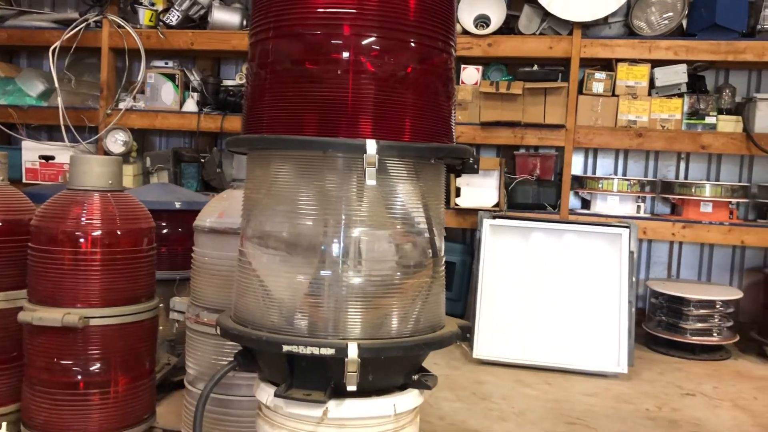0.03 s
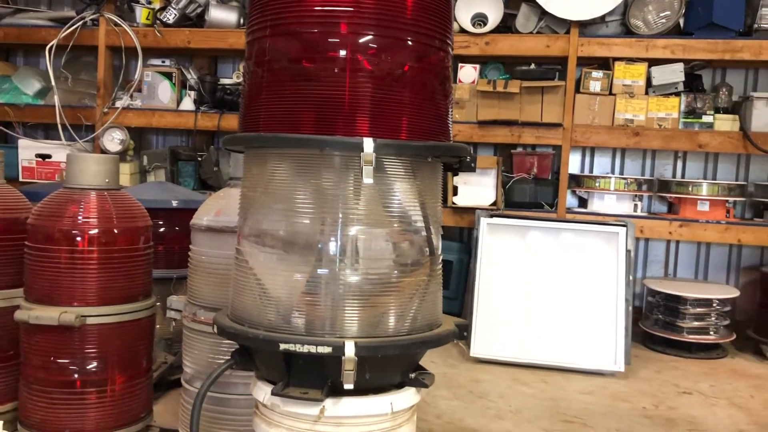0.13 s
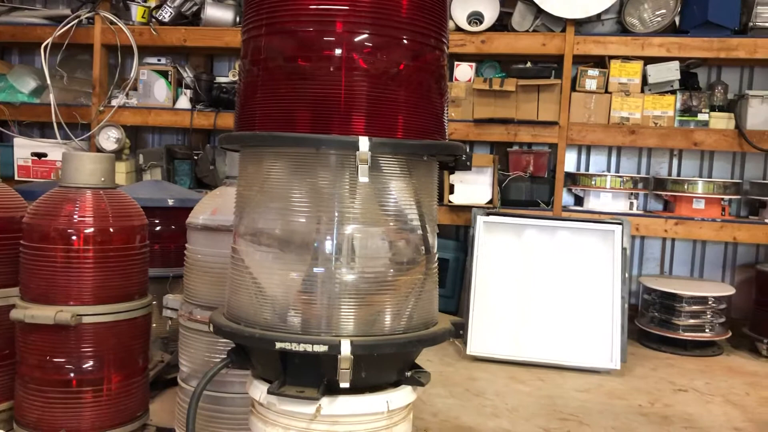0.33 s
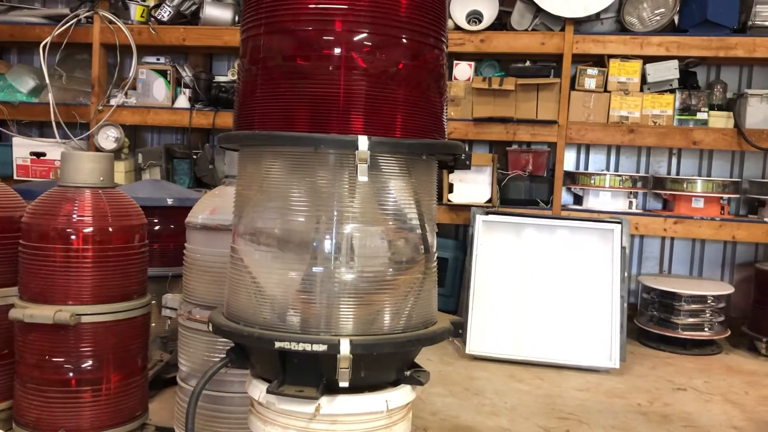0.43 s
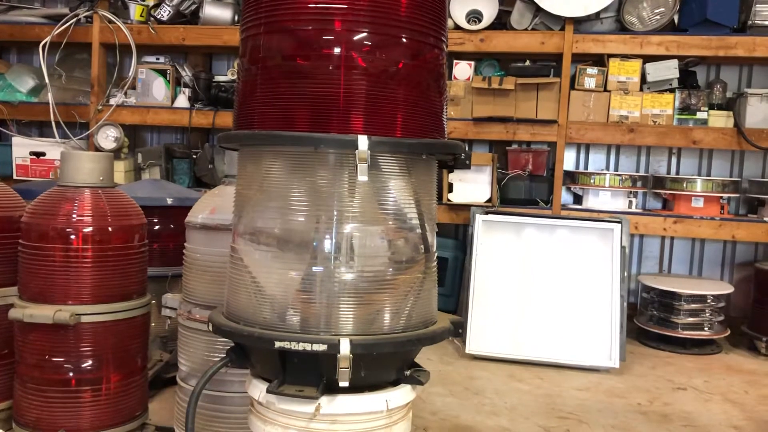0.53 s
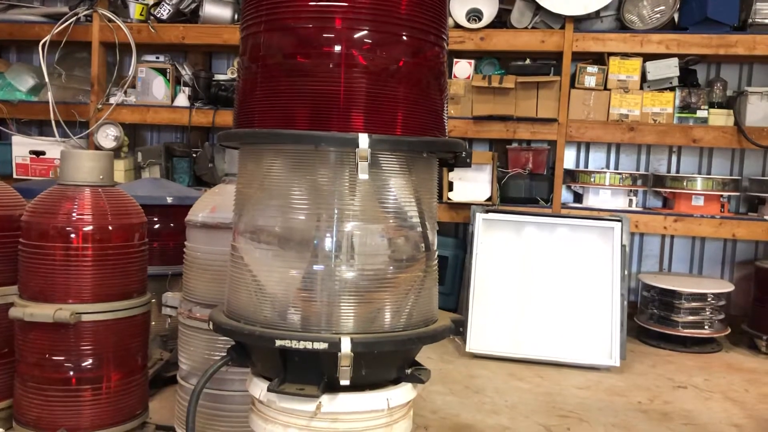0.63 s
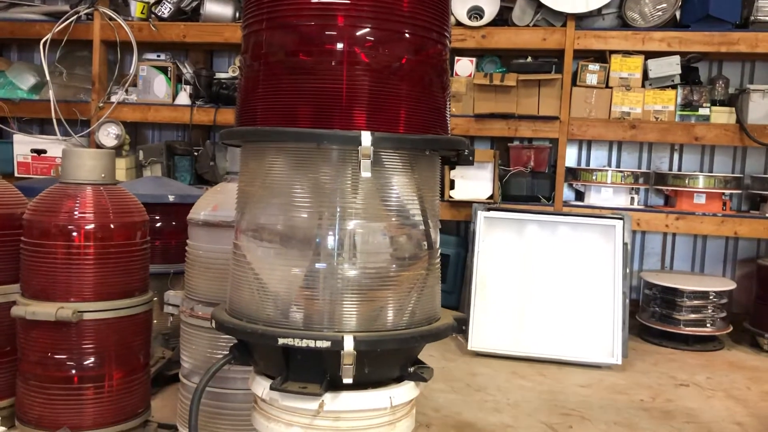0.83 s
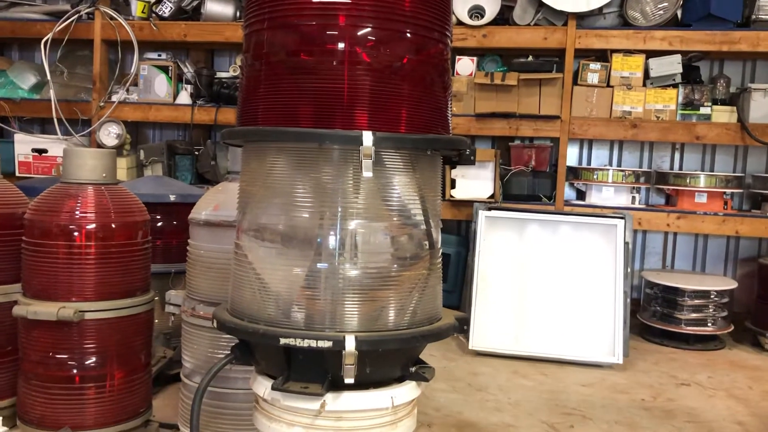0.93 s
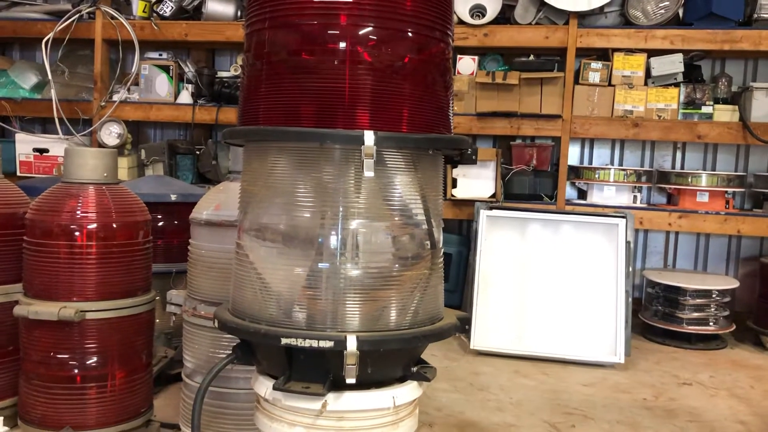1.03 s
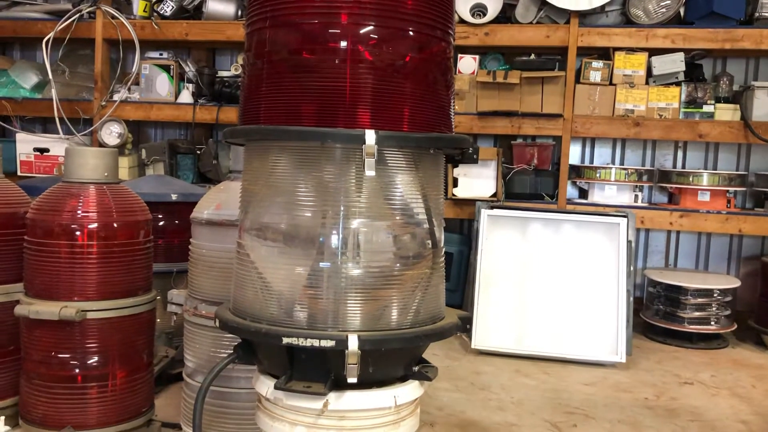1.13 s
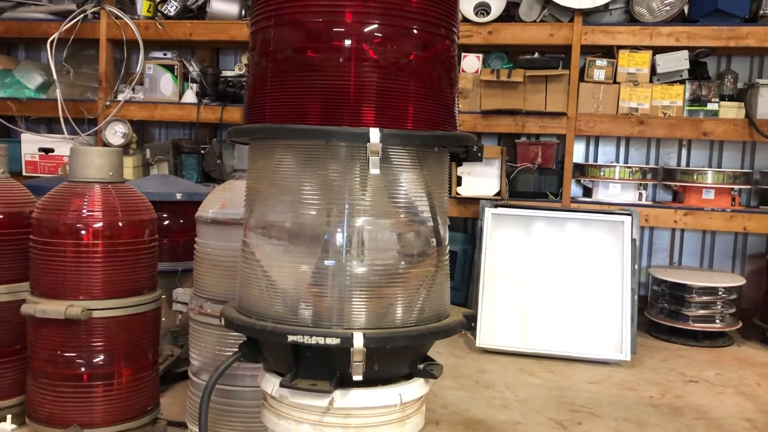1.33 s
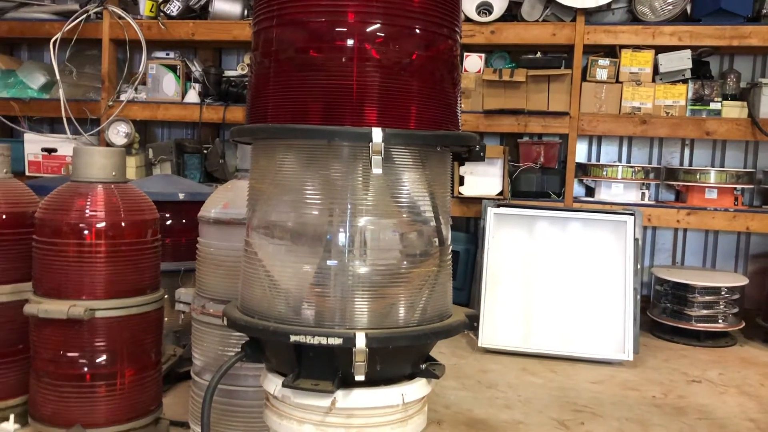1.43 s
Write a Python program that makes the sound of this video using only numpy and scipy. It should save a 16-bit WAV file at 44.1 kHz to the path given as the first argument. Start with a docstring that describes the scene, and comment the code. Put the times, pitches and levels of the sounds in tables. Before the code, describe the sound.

A strobe beacon fires with one sharp pop that rings briefly through a workshop. After a short pause, its power supply recharges with a thin, sizzling electrical buzz, over a faint hum and low room rumble.

```python
"""A workshop rumbles softly under a faint transformer hum. A strobe beacon fires once:
the trigger ticks, the flash tube pops inside its ribbed lens and the room rings.
After a short pause the power supply recharges, buzzing to the end: its core chirps and
whistles in step with the mains, over a rattle of laminations and a fine sizzle."""
import sys
import numpy as np
from scipy import signal
from scipy.fft import rfft, irfft
from scipy.io import wavfile

SR = 44100
rng = np.random.default_rng(int(sys.argv[2]) if len(sys.argv) > 2 else 0)


def bounce(signal):
    """Save signal as a 16-bit WAV file at the path given by the first command-line argument."""
    frames = np.transpose(np.atleast_2d(signal))
    limited = np.clip(frames, -1, 1)
    pcm = np.round(limited * 32767).astype(np.int16)
    wavfile.write(sys.argv[1], SR, pcm)


N = 66150
MAINS_HZ, TOP_HZ = 59.987, 15780
FLASH_S, CHARGE_S, CHARGE_RISE_S = 0.2177, 0.3835, 0.0014

# tone of the room's rumble (frequency [Hz], relative level [dB])
RUMBLE_EQ = [(20, -66), (32, -30), (46, -3.5), (100, -6), (160, -10.5), (260, -9), (400, -12.5), (800, -15),
             (1100, -22.5), (2000, -23.5), (3500, -25), (5000, -29), (8000, -34.5), (15000, -37)]
# transformer partials (mains multiple [rounded when played], idle level [dB], charging level [dB])
HUM_PARTIALS = [(4, -73.5, -74), (8, -69.5, -67.5), (10, -80, -77.5), (12, -79, -84), (20, -78, -82),
                (22, -76.5, -75), (28, -80.5, -88), (32, -83, -80.5), (36, -86, -83.5), (40, -87, -86),
                (48, -84, -74), (56, -81.5, -101), (62, -85, -62), (65, -90, -90), (66.25, -80, -73),
                (76.7, -85, -72)]
# core chirps (delay [ms], pitch [Hz], glide [Hz/ms], half length [ms], relative level [dB],
# signed gain in the other half cycle [ratio])
CORE_CHIRPS = [(6.45, 14530, 300, .6, -43, 1), (7.9, 14500, 0, .5, -56, 1),
               (5.5, 9800, -200, .65, -45.7, -.8), (5.8, 9000, 0, .7, -53, -1),
               (7.7, 7300, 200, .65, -53, -1), (10.2, 5270, 120, 1.3, -57, -.3),
               (1.9, 5230, 120, 1.3, -54, -.2), (.3, 4200, 150, 1, -57, 0)]
# whistles in one direction of the current only
# (delay [ms], pitch [Hz], glide [Hz/ms], half length [ms], relative level [dB])
CORE_WHISTLES = [(5.8, 3545, 32, 2.5, -47.2), (8.7, 4200, 100, 1.5, -51.5), (3.6, 3000, 150, 1.2, -65),
                 (2.5, 11600, 0, 1.3, -56)]
# lamination rattle (frequency [Hz], relative level of even harmonics [dB], of odd harmonics [dB])
RATTLE_EQ = [(700, -90, -93), (1900, -86, -91), (2600, -87, -91), (3200, -83, -85), (3800, -80, -75),
             (4450, -77, -70), (4750, -81, -74), (5300, -76, -69), (6100, -85, -73), (6900, -90, -69),
             (7700, -88, -74), (8300, -86, -77), (9000, -78, -70), (10500, -77, -74), (11000, -77, -75),
             (11600, -73, -76), (12050, -84, -83), (12500, -73, -78), (13000, -71, -80), (13550, -77, -84),
             (14200, -72, -85), (15100, -72, -86), (15700, -69, -85)]
# tone of the sizzle (frequency [Hz], relative level [dB])
SIZZLE_EQ = [(1000, -28), (3000, -20), (3600, -5), (6000, -6), (7000, -4), (8300, -6), (9800, 0),
             (11200, -6), (11600, -3), (12100, -8), (13000, -4), (13700, -5), (14300, 3), (15700, -1)]
# narrow resonances of the supply's case (frequency [Hz], width [Hz], boost [dB])
CASE_PEAKS = [(4139, 50, 5), (5339, 40, 3), (7019, 50, 7), (7499, 40, 5), (7978, 50, 9), (9058, 40, 3),
              (9898, 40, 5), (10018, 40, 3), (14037, 60, 10.5), (14277, 50, 4), (14877, 40, 4),
              (14997, 60, 8)]
# tone of the reverb tail (frequency [Hz], relative level [dB])
TAIL_EQ = [(100, -36), (300, -24), (490, -2.5), (660, -15.5), (900, -1.5), (1150, -6), (1550, -9),
           (2200, 0), (2650, -4.5), (3820, 1.5), (4450, -6), (6350, -8.5), (8000, -13.5), (10400, -10),
           (15500, -14.5)]
# ring time of the room (frequency [Hz], time to fall 60 dB [s])
TAIL_T60 = [(300, 0.6), (900, 0.88), (2200, 0.97), (4000, 0.82), (7000, 0.87), (11000, 0.36), (15000, .3)]
# trigger knocks (time [s], lower band edge [Hz], width [Hz], decay [s], level [dB])
TRIGGER_KNOCKS = [(0.2106, 377, 400, 0.0059, -46), (0.2135, 2930, 1700, .003, -45)]
# hollow knock of the air inside the lens (pitch [Hz], decay [s], level [dB])
CAVITY_MODES = [(864, 0.0054, -30), (998, 0.0063, -34.5)]
# tone of the pop (frequency [Hz], relative level [dB])
POP_EQ = [(100, -43), (300, -28.5), (420, -6.5), (560, -5.5), (660, -21.5), (800, -7.5), (1000, -4.5),
          (1450, -15), (1900, -12), (2200, 1.5), (2600, -10.5), (3900, -2), (4700, -7), (7000, -7.5),
          (8300, -13), (10200, -8.5), (12600, -12), (13600, -20), (16000, -19.5)]
# resonances of tube and lens (frequency [Hz], width [Hz], boost [dB])
LENS_PEAKS = [(496, 110, 2.5), (910, 140, 2.5), (2250, 97, 2.5), (2965, 120, 10), (3860, 470, 6.5),
              (6620, 120, 7), (7340, 180, 2.5)]


def undb(db):
    """Decibels to gain."""
    return 10 ** (np.asarray(db) / 20)


def unit(x):
    """Scale to rms 1."""
    return x / np.sqrt(np.mean(x ** 2))


def along(points, hz):
    """Read (Hz, value) points on a log-frequency axis."""
    f, v = np.array(points, float).T
    return np.interp(np.log(np.maximum(hz, 1)), np.log(f), v)


def colour(x, points=((1, 0), (SR, 0)), peaks=(), keep_power=True):
    """Minimum-phase EQ: a broad curve plus resonant peaks."""
    hz = np.arange(N + 1) * SR / (2 * N)
    boost_db = sum(db / (1 + (2 * (hz - f) / width) ** 2) for f, width, db in peaks)
    gain = undb(along(points, hz) + boost_db)
    cepstrum = irfft(np.log(unit(gain) if keep_power else gain))
    cepstrum[1:N] *= 2
    cepstrum[N + 1:] = 0
    return irfft(rfft(x, 2 * N) * np.exp(rfft(cepstrum)))[:N]


def noise():
    """White noise of rms 1."""
    return rng.standard_normal(N)


def drift(points):
    """A random curve through evenly spaced points."""
    return np.interp(np.linspace(0, points - 1, N), np.arange(points), rng.standard_normal(points))


def swell(age, rise_s):
    """Attack envelope: zero before the start, then settling at one."""
    return 1 - np.exp(-np.maximum(age, 0) / rise_s)


def rumble():
    """A steady, bass-heavy bed of room tone."""
    return undb(-65) * colour(noise(), RUMBLE_EQ)


def hum(t):
    """The transformer's mains harmonics shift their balance under load."""
    load = swell(t - CHARGE_S, CHARGE_RISE_S)
    out = np.zeros(N)
    for multiple, idle_db, busy_db in HUM_PARTIALS:
        tone = np.sin(2 * np.pi * (round(multiple) * MAINS_HZ * t + rng.random()))
        out += undb(idle_db + load * (busy_db - idle_db)) * tone
    return np.sqrt(2) * out


def chirp(t, delay_ms, hz, glide, half_ms, db):
    """A short gliding ring of the core, at the same spot in every mains cycle."""
    period = 1 / MAINS_HZ
    from_peak_ms = ((t - delay_ms / 1000 + period / 2) % period - period / 2) * 1000
    turns = (hz + glide * from_peak_ms / 2) * from_peak_ms / 1000
    flutter_db = .4 * drift(points=120)
    envelope = undb(db + flutter_db) * np.exp(-(from_peak_ms / half_ms) ** 2)
    return np.sqrt(2) * envelope * np.sin(2 * np.pi * turns)


def rattle(t, size=4096):
    """The laminations clatter in a dense loop, one mains cycle long."""
    harmonic = np.arange(size // 2 + 1)
    hz, table = harmonic * MAINS_HZ, np.array(RATTLE_EQ)
    even_db, odd_db = along(table[:, :2], hz), along(table[:, ::2], hz)
    in_band = (hz > table[0, 0]) & (hz < TOP_HZ)
    gain = undb(np.where(harmonic % 2, odd_db, even_db) - .5) * in_band
    cycle = irfft(gain * np.exp(2j * np.pi * rng.random(len(hz)))) * size / np.sqrt(2)
    return np.interp(t * MAINS_HZ, np.arange(size) / size, cycle, period=1)


def sizzle(t, depth=.8, peak_s=.0064):
    """Bright hiss that pulses twice per mains cycle."""
    pulse = 1 + depth * np.cos(4 * np.pi * MAINS_HZ * (t - peak_s))
    return undb(-57.5) * colour(noise() * pulse, SIZZLE_EQ)


def charger(t):
    """The recharging supply buzzes through its resonant case; the whistle fades in more slowly."""
    core = sum(chirp(t, *row) + other * chirp(t - .5 / MAINS_HZ, *row) for *row, other in CORE_CHIRPS)
    whistle = swell(t - CHARGE_S, rise_s=.07) * sum(chirp(t, *row) for row in CORE_WHISTLES)
    buzz = (core + whistle + sizzle(t) + rattle(t)) * swell(t - CHARGE_S, CHARGE_RISE_S)
    return colour(buzz, peaks=CASE_PEAKS, keep_power=False)


def room_ring(t, predelay_s=.0096, early_decay_s=.025):
    """A wash of early echoes off the shelves, and a tail that loses its top first."""
    age = np.maximum(t - FLASH_S - predelay_s, 0)
    spectrum, hz = rfft(noise()), np.arange(N // 2 + 1) * SR / N
    edges = np.geomspace(100, SR / 2, 25)
    tail = np.zeros(N)
    for low, high in zip(edges, edges[1:]):
        band = irfft(spectrum * ((hz >= low) & (hz < high)), N)
        tail += band * undb(-60 * age / along(TAIL_T60, np.sqrt(low * high)))
    onset = swell(age, rise_s=.002)
    early = colour(noise() * np.exp(-age / early_decay_s) * onset, POP_EQ, LENS_PEAKS)
    return undb(-31.5) * early + undb(-34.5) * colour(tail * onset, TAIL_EQ)


def trigger(t):
    """Two tiny knocks of the trigger lead into the flash."""
    out = np.zeros(N)
    for start, hz, width, decay, db in TRIGGER_KNOCKS:
        age = np.maximum(t - start, 0)
        band = signal.butter(2, [hz, hz + width], "band", fs=SR, output="sos")
        ring = unit(signal.sosfilt(band, noise()))
        out += undb(db) * ring * swell(age, rise_s=.00062) * np.exp(-age / decay)
    return out


def flash(t, rise_s=.0033, hold_s=.01, release_s=.00071, snap_delay_s=.0041, snap_s=.0014):
    """The discharge snaps and rattles round the lens; the air inside gives a hollow knock."""
    age = np.maximum(t - FLASH_S, 0)
    attack = np.sqrt(np.minimum(age / rise_s, 1))
    sag = undb(-535 * age)
    release = np.exp(-np.maximum(age - hold_s, 0) / release_s)
    snap = np.sign(noise()) * np.exp(-((t - FLASH_S - snap_delay_s) / snap_s) ** 2)
    snap = signal.sosfilt(signal.butter(1, 2460, "high", fs=SR, output="sos"), snap)
    body = np.sign(noise()) * attack * sag * release
    pop = colour(undb(-18) * body + undb(-16) * snap, POP_EQ, LENS_PEAKS)
    knock = sum(undb(db) * np.exp(-age / decay) * np.sin(2 * np.pi * hz * age)
                for hz, decay, db in CAVITY_MODES)
    return pop + swell(age, rise_s=.0011) * knock


def scene():
    """Mono mix: pop, reverb and buzz over the bed of hum and rumble."""
    t = np.arange(N) / SR
    return (flash(t) + trigger(t) + room_ring(t) + charger(t) + hum(t) + rumble())[None]


def record(dry):
    """A steep low-pass trims the very top."""
    return signal.sosfilt(signal.ellip(10, .1, 80, TOP_HZ, fs=SR, output="sos"), dry)


dry = scene()
out = record(dry)
bounce(out)
```